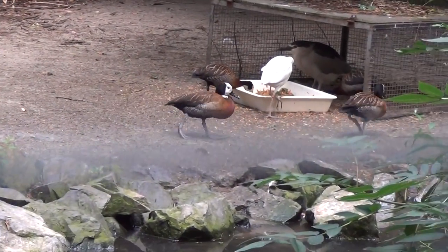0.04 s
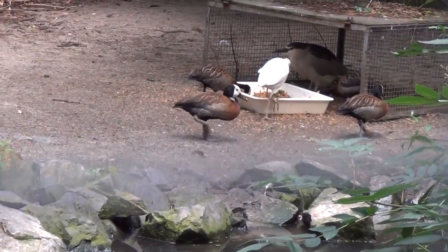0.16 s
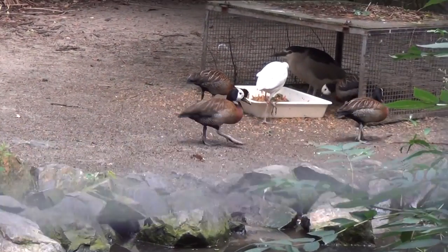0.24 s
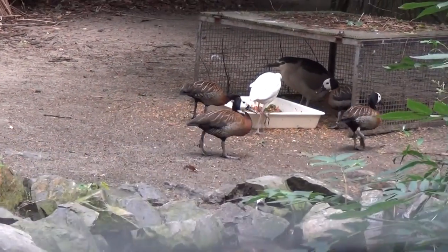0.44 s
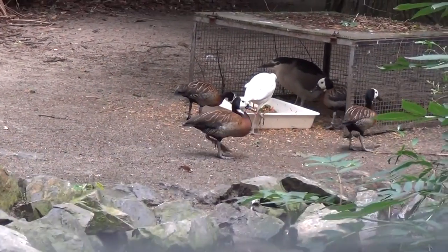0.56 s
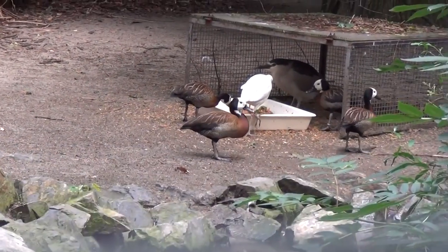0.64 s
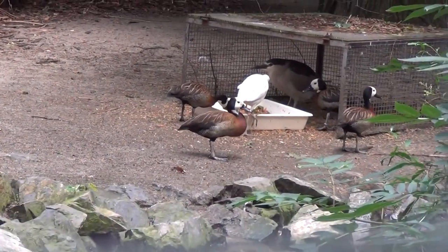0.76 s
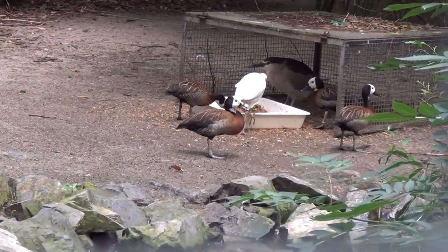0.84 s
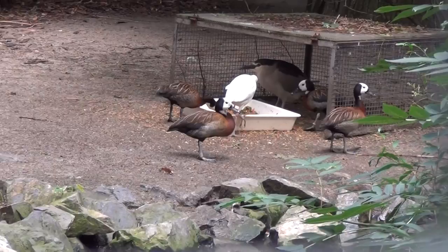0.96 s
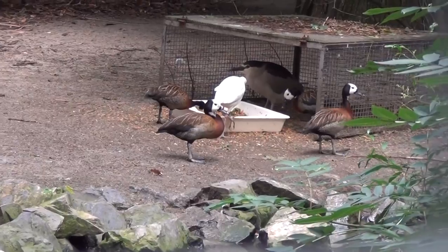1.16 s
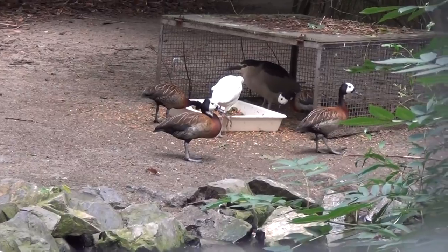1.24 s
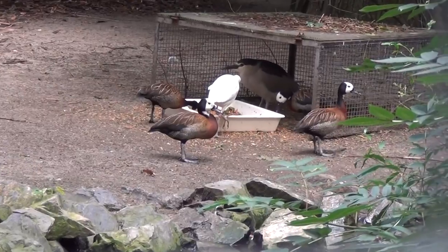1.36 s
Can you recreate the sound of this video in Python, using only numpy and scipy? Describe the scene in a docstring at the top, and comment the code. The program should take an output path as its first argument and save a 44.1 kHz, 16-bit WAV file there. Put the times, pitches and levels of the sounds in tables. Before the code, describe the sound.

Ducks whistle in an outdoor enclosure: two short falling whistles, a two-note call, then two louder overlapping three-note calls. The high, clear notes come from slightly left with a brief echo, over faint background noise and light taps.

```python
"""Whistling ducks call in an outdoor enclosure: two short falling whistles, a two-note call, then two
overlapping three-note calls. Each is a clear gliding tone with overtones that briefly splits into half-pitch lines.
Walls and rocks throw the calls back over a faint background with a low hum and a few light taps."""
import sys
import numpy as np
from scipy import signal
from scipy.fft import rfft, irfft
from scipy.io import wavfile
from scipy.ndimage import uniform_filter1d

SR = 44100
rng = np.random.default_rng(int(sys.argv[2]) if len(sys.argv) > 2 else 0)


def log_audio(samples):
    """Write samples as a 16-bit WAV file to the path given in sys.argv[1]."""
    # one column per channel
    frames = np.atleast_2d(samples).T
    # limit to full scale, then quantise
    limited = np.clip(frames, -1, 1)
    pcm = np.round(limited * 32767).astype(np.int16)
    wavfile.write(sys.argv[1], SR, pcm)


N = 61739

# One table per call (s, pitch Hz, level of the fundamental dB)
SOFT_FALL = [(0.092, 4330, -35), (0.122, 3280, -37), (0.142, 2285, -41), (0.16, 2200, -59)]
LOUD_FALL = [(.21, 4540, -24), (.22, 4136, -28.5), (.23, 3787, -18.5), (.24, 3378, -29.5), (.252, 3210, -21), (.268, 2500, -44), (.28, 2210, -39), (.306, 2093, -37.5), (.325, 2040, -43)]
TWO_NOTES = [(0.347, 4887, -33), (0.353, 4880, -24.5), (0.366, 4055, -20.5), (0.373, 3100, -22), (.386, 2783, -30), (0.394, 2338, -51), (.408, 2582, -40.5),
             (0.425, 2952, -23), (0.447, 2893, -28.5), (0.469, 2180, -44.5), (0.485, 2030, -33)]
FIRST_THREE_NOTES = [(.492, 2950, -34.5), (.51, 3310, -33.5), (.529, 3420, -20.5), (.538, 3500, -35.5), (.55, 3570, -23), (.562, 3680, -15), (.569, 4200, -27), (.577, 4316, -10), (.591, 4950, -34), (.598, 5150, -17), (.602, 5700, -22.5), (.629, 5760, -20), (.637, 4900, -28), (.641, 4300, -21.5), (.648, 3480, -20), (.661, 3150, -25), (.678, 3360, -18), (.69, 3660, -22.5), (.697, 4130, -20.5), (.72, 4290, -16.5), (.728, 4780, -19.5), (.746, 5320, -29), (.772, 4700, -29.5), (.788, 3400, -36), (.797, 3160, -24.5), (.812, 3340, -19.5), (.832, 3440, -25.5), (.857, 3310, -26.5), (.872, 2930, -31.5), (.883, 2450, -37.5), (.91, 2230, -32.5)]
SECOND_THREE_NOTES = [(.758, 2985, -33), (.77, 3422, -28.5), (.78, 4055, -32.5), (.8, 4094, -20.5), (.82, 4005, -23.5), (.838, 4074, -22), (.852, 4130, -17), (.859, 4710, -25.5), (.872, 4892, -23), (.882, 5576, -35), (.888, 5748, -23.5), (.897, 5930, -24), (.903, 5123, -30), (.91, 4465, -16.5), (.919, 3606, -22), (.924, 3281, -17.5), (.939, 3288, -18), (.944, 3750, -25), (.95, 3920, -18), (.965, 4060, -19), (.993, 4046, -18.5), (1.0, 4495, -18), (1.014, 4656, -29.5), (1.023, 5120, -33), (1.042, 4558, -40), (1.056, 3970, -42), (1.065, 3180, -31), (1.073, 2990, -28.5), (1.092, 3162, -21), (1.108, 3181, -20), (1.122, 3100, -20.5), (1.133, 2960, -35.5), (1.15, 2730, -51.5), (1.175, 1960, -51)]
# Each call with its place and tone: (table, left-right dB, octave dB before the throat, dB per further overtone)
CALLS_HEARD = [(SOFT_FALL, 4.8, -11, -9), (LOUD_FALL, 4.4, -6.5, -11.5), (TWO_NOTES, 3.8, -7, -13.5), (FIRST_THREE_NOTES, 2.7, -7.5, -7.5), (SECOND_THREE_NOTES, 4.1, -10.5, -9.5)]
ATTACK_S, RELEASE_S = 0.0019, 0.028
JITTER, JITTER_HZ, SHIMMER_DB = .005, 400, .8  # fixed
# Stretches where strong and weak cycles alternate (start s, end s, half-pitch lines dB against the fundamental)
SPLITS = [(.37, .39, -20), (.415, .45, -21), (.541, .57, -7), (.678, .717, -11), (.805, .86, -19), (1.088, 1.125, -16)]  # fixed
SPLIT_EDGE_S, SPLIT_STEP_DB = .008, -6  # fixed
# A second oscillation joins one note and adds side lines (start s, end s, rate Hz, dB against the fundamental)
SECOND_TONE = (.977, .998, 1660, -13)  # fixed
# Light taps of bills and feet (s, level dB)
TAPS = [(.0748, -33), (.113, -32), (.235, -33), (.35, -26), (.5226, -36), (.6017, -37), (1.2565, -37)]  # fixed
# Background (Hz, dB per Hz) and its level as it eases off (s, dB)
GROUND = [(25, -43), (55, -13), (200, -4), (350, 2), (700, 0.5), (1400, -1.5), (2500, -1), (4500, -7.5), (8000, -19.5), (12000, -23), (16000, -30)]
GROUND_DB = [(0, -46), (.45, -46.5), (.65, -51), (.95, -54.5), (1.4, -51.5)]
HUM_HZ, HUM_DB = 79.3, -69.5
# Ring of an earlier whistle (s, dB) and its pitch
RING, RING_HZ, RING_WIDTH_HZ = [(0, -60), (.028, -40), (.05, -52.5), (.2, -102.5)], 3177, 40
# Enclosure: decay (Hz, t60 s) and single echoes (delay s, dB)
DECAY = [(1000, 1.5), (3000, 0.58), (5000, 0.86), (8000, 0.69), (14000, 1.4)]
ECHOES = [(0.019, -17), (.034, -26)]  # fixed
TAIL_DB, TAIL_DELAY_S, NEAR_T60_S = -12.5, 0.0027, 0.13
NEAR_DB = -11  # fixed
TAIL_WIDTH, TAIL_PAN_DB, GROUND_WIDTH = 0.32, 0, 0.18
EDGE_HZ = 15700  # fixed
TIME = np.arange(N) / SR
# Colour of throat and bill (Hz, dB)
THROAT = [(1600, -10), (2100, -8.5), (2900, -2.5), (4200, 7), (6000, -0.5), (7200, -5), (8200, -4.5), (9200, -17), (10300, -7), (11200, -14), (12200, -9), (13300, -18), (14500, -19), (16000, -41)]  # fixed
# The voice cracks across these pitches (Hz); reach of each break, its pull, and the dip in level there
BREAKS_HZ = [3691, 4430, 5290]
BREAK_WIDTH_HZ, BREAK_PULL = 77, 1.2
# Overtones are weaker at both ends of the range (pitch Hz, dB) and grow with effort (dB per dB above EFFORT_DB)
PURITY = [(2120, -6), (2210, 5), (3100, -2), (4000, 5), (4800, 3), (5800, -2)]  # fixed
BRIGHTEN, EFFORT_DB = 0.38, -15
# Phase between the two microphone ports for the calls (Hz, radians left leads)
PORTS = [(0, 0.85), (3450, -0.37), (4130, -0.75), (8100, 0.88), (11000, -0.07)]
# Stretches where the voice turns hoarse, fluttering and dull (start s, end s, pitch jitter as a share)
HOARSE = [(.345, .362, .008), (.632, .645, .015), (.73, .775, .018), (.86, .915, .032), (1.005, 1.055, .022)]  # fixed
HUM_OCTAVE_DB = -2.5
TAP_DECAY_S, TAP_OCTAVES, TAP_HZ = .0014, .45, 1800  # fixed
HOARSE_HZ, HOARSE_FLUTTER_DB, HOARSE_DULL_DB = 600, 4, -13  # fixed
CRACK_DB = -8  # fixed
AIR = [(1000, -29), (2200, -8.5), (4000, 0), (6000, 0.5), (8500, -8), (12000, -22), (16000, -35)]  # fixed
AIR_DB = -25.5
OVERTONE_FLUTTER_DB = 3.5  # fixed


def amp(db):
    """Decibels to gain."""
    return 10 ** (np.asarray(db) / 20)


def unit(x):
    """Scales to rms 1."""
    return x / np.sqrt(np.mean(x ** 2) + 1e-20)


def read(points, hz):
    """Reads a spectrum on a log-frequency axis."""
    f, value = np.transpose(points)
    return np.interp(np.log(hz + 1), np.log(f + 1), value)


def noise(colour):
    """Noise of rms 1 whose gain is a function of frequency."""
    return unit(irfft(rfft(rng.standard_normal(N)) * colour(np.fft.rfftfreq(N, 1 / SR)), N))


def wander(hz):
    """Random drift up to a given rate."""
    return noise(lambda f: 1 / (1 + (f / hz) ** 4))  # fixed


def gate(start, end, rise, fall):
    """Smooth on-off envelope."""
    return np.sin(np.pi / 2 * np.clip((TIME - start) / rise + .5, 0, 1) * np.clip((end - TIME) / fall + .5, 0, 1)) ** 2


def pan(db):
    """Left and right gains."""
    g = amp(np.array([[db / 2], [-db / 2]]))
    return g / g.mean()


def spread(mid, side, width):
    """Stereo from a middle and a side signal."""
    return np.array([mid + width * side, mid - width * side])


def whistle(call, octave_db, step_db):
    """One call: a gliding tone, its overtones, half-pitch lines where the voice splits, and a little air."""
    s, pitch, level = np.transpose(call)
    glide, crack = cracked(uniform_filter1d(np.interp(TIME, s, pitch), size=90))
    hoarse, wobble = hoarseness(glide)
    hz = glide * (1 + JITTER * wander(JITTER_HZ) + wobble)
    fundamental_db = read(THROAT, hz)

    def partial(f):
        """A line that follows f, coloured by the throat."""
        return amp(read(THROAT, f) - fundamental_db) * (f < SR / 2) * np.sin(2 * np.pi * np.cumsum(f) / SR)

    bright_db = octave_db + read(PURITY, hz) + BRIGHTEN * (np.interp(TIME, s, level) - EFFORT_DB) + HOARSE_DULL_DB * hoarse
    tone = partial(hz) + sum(amp(bright_db + step_db * k + OVERTONE_FLUTTER_DB * wander(HOARSE_HZ)) * partial((k + 2) * hz) for k in range(4))
    split = sum(amp(db) * gate(a, b, SPLIT_EDGE_S, SPLIT_EDGE_S) for a, b, db in SPLITS if leads(call, a))
    tone += split * sum(amp(SPLIT_STEP_DB * abs(k - 1)) * partial((k + .5) * hz) for k in range(5))
    a, b, rate_hz, db = SECOND_TONE
    sides = sum(partial(k * hz + rate_hz) + partial(abs(k * hz - rate_hz)) for k in (1, 2))
    tone += amp(db) * gate(a, b, SPLIT_EDGE_S, SPLIT_EDGE_S) * sides
    tone += amp(AIR_DB) * noise(lambda f: amp(read(AIR, f)))
    flutter_db = (SHIMMER_DB + HOARSE_FLUTTER_DB * hoarse) * np.tanh(wander(JITTER_HZ))
    loudness = amp(np.interp(TIME, s, level) + flutter_db + CRACK_DB * crack)
    return np.sqrt(2) * tone * loudness * gate(s[0], s[-1], ATTACK_S, RELEASE_S)


def leads(call, s):
    """True if this is the oldest call still sounding at time s."""
    return call is next((c for c, *_ in CALLS_HEARD if c[-1][0] > s), None)


def taps():
    """Short dull knocks on the feeding tray and the ground."""
    out = np.zeros(N)
    for s, db in TAPS:
        age = np.maximum(TIME - s, 0) / TAP_DECAY_S
        out += amp(db) * age * np.exp(1 - age) * noise(lambda f: 1 / (1 + (np.log2((f + 1) / TAP_HZ) / TAP_OCTAVES) ** 2)) / 2
    return out


def background():
    """Soft outdoor wash, a low hum and the dying ring of an earlier whistle."""
    mid, side = (noise(lambda f: amp(read(GROUND, f))) for _ in range(2))
    side = signal.lfilter(*signal.butter(1, 900, "high", fs=SR), side)  # the bass is the same in both ears
    wash = spread(mid, side, GROUND_WIDTH) * amp(np.interp(TIME, *np.transpose(GROUND_DB)))
    hum = amp(HUM_DB) * unit((np.sin(2 * np.pi * HUM_HZ * TIME) + amp(HUM_OCTAVE_DB) * np.sin(4 * np.pi * HUM_HZ * TIME)) * (1 + 0.28 * wander(hz=2.8)))
    ring = noise(lambda f: 1 / (1 + ((f - RING_HZ) / RING_WIDTH_HZ) ** 2)) * amp(np.interp(TIME, *np.transpose(RING)))
    return wash + hum + ring


def reverb(x, decay, delay_s):
    """Diffuse reflections, each band dying at its own speed."""
    hz, t, z = signal.stft(rng.standard_normal((2, SR)), SR, nperseg=256)
    tail = signal.istft(z * amp(-60 * t / read(decay, hz)[:, None]), SR, nperseg=256)[1][:, :SR]  # fixed
    tail = tail * np.minimum(TIME[:SR] / delay_s, 1) ** 2
    return signal.fftconvolve(x, spread(*tail, TAIL_WIDTH) / np.linalg.norm(tail[0]), axes=1)[:, :N]


def cracked(hz):
    """Pushes the pitch away from the breaks, so that glides climb in steps; also says when the voice is cracking (0-1)."""
    away = (hz[:, None] - np.array(BREAKS_HZ)) / BREAK_WIDTH_HZ
    push = BREAK_PULL * np.tanh(2 * away) * np.exp(-away ** 2 / 2)
    return hz + BREAK_WIDTH_HZ * push.sum(1), np.exp(-(away + push) ** 2 / 2).sum(1)


def ports(x):
    """Turns the phase of left against right."""
    turn = np.exp(.5j * read(PORTS, np.fft.rfftfreq(N, 1 / SR)))
    return irfft(rfft(x) * np.array([turn, turn.conj()]), N)


def hoarseness(hz):
    """When the high notes are hoarse (0-1), and the fast, irregular wobble of their pitch there."""
    stretches = np.array([gate(a, b, SPLIT_EDGE_S, SPLIT_EDGE_S) for a, b, _ in HOARSE]) * (hz > BREAKS_HZ[0])
    return stretches.sum(0), np.array(HOARSE)[:, 2] @ stretches * wander(HOARSE_HZ)


def scene():
    """The ducks, slightly left, with their echoes, over the background."""
    ducks = sum(whistle(call, *tone) * pan(db) for call, db, *tone in CALLS_HEARD)
    mono = ducks.mean(0)[None]
    echoes = sum(amp(db) * np.pad(ducks, ((0, 0), (round(s * SR), 0)))[:, :N] for s, db in ECHOES)
    near = amp(NEAR_DB) * reverb(ducks, [(4000, NEAR_T60_S)], delay_s=0.0023)
    far = amp(TAIL_DB) * reverb(mono, DECAY, TAIL_DELAY_S) * pan(TAIL_PAN_DB)
    return ports(ducks + echoes + near) + far + taps() + background()


def record(dry):
    """The recorder's band limit."""
    return signal.oaconvolve(dry, signal.firwin(511, EDGE_HZ, window=("kaiser", 9), fs=SR)[None], "same")  # fixed


dry = scene()
out = record(dry)
log_audio(out)
```